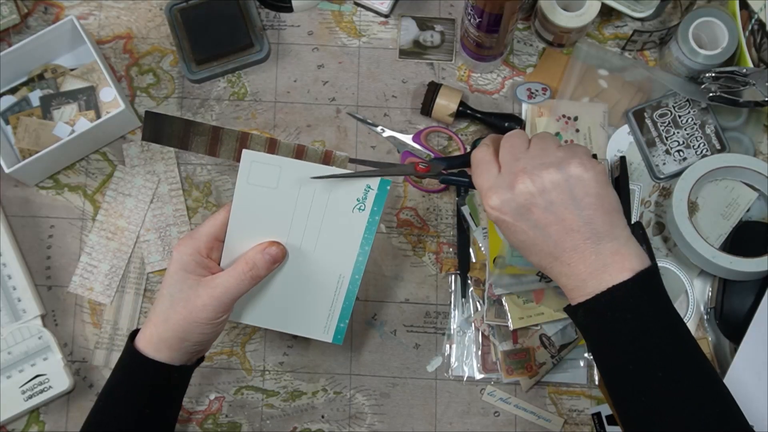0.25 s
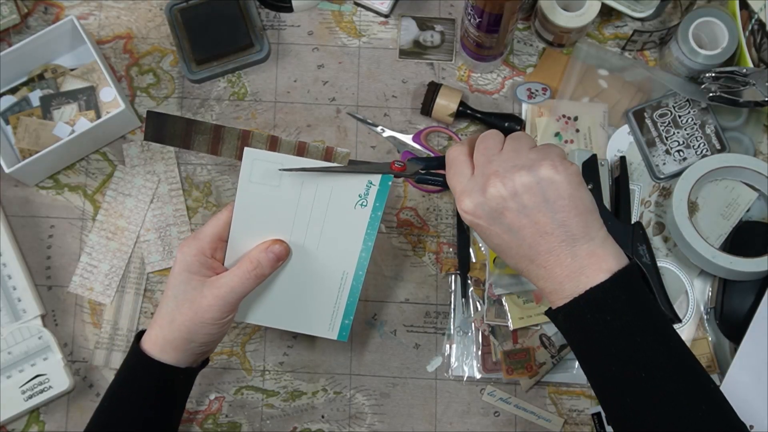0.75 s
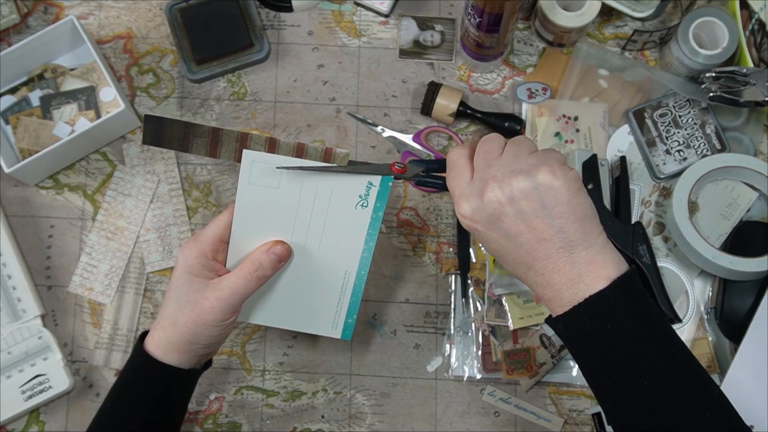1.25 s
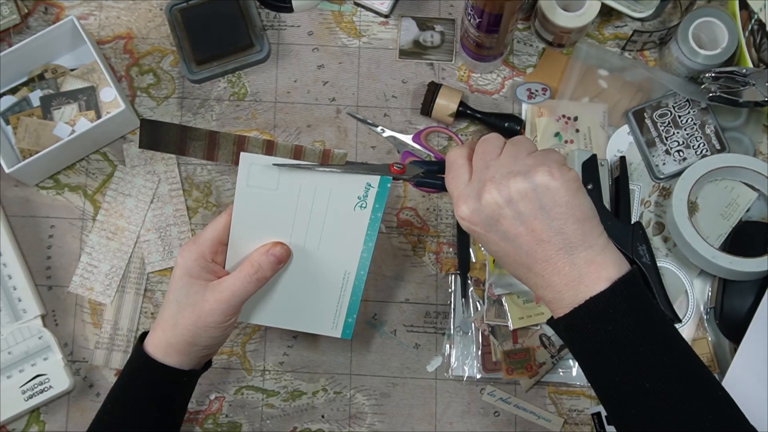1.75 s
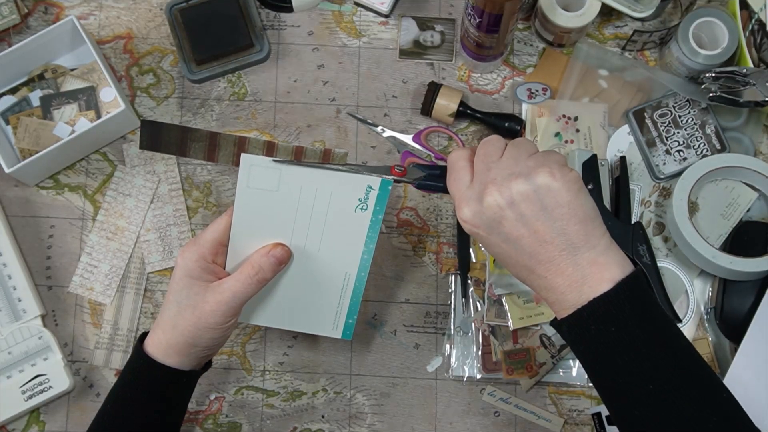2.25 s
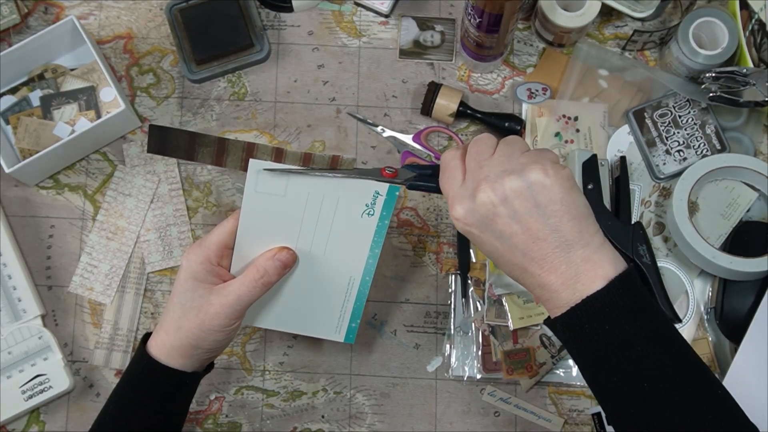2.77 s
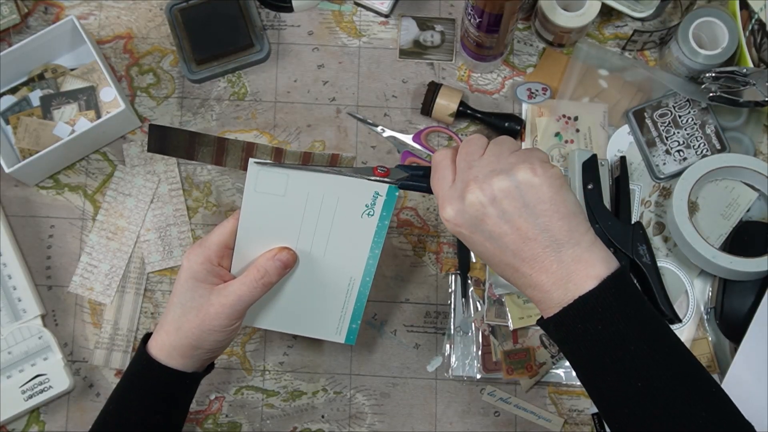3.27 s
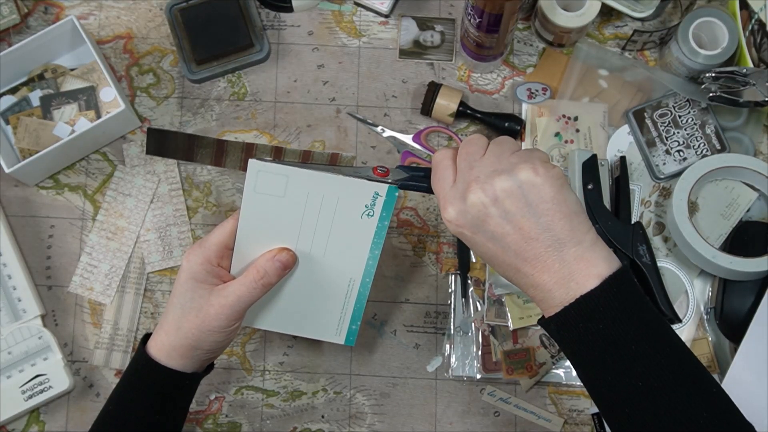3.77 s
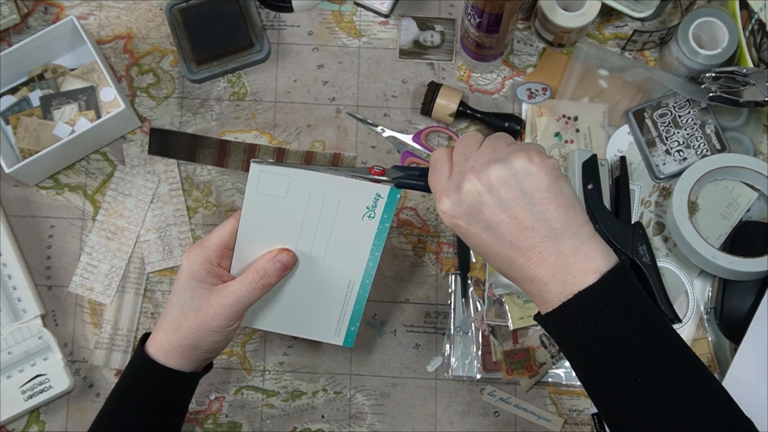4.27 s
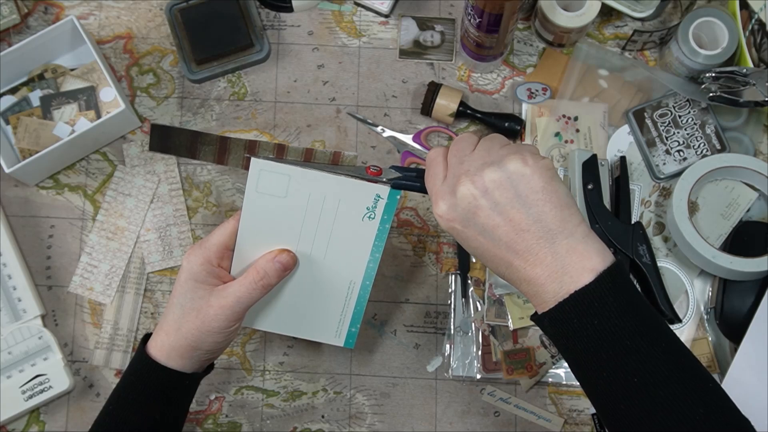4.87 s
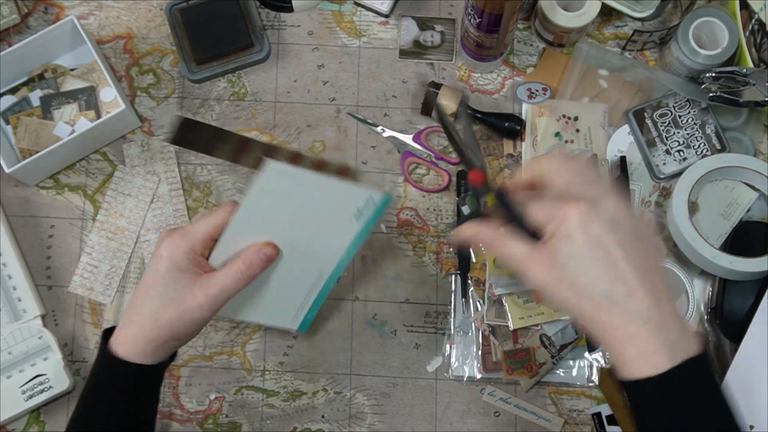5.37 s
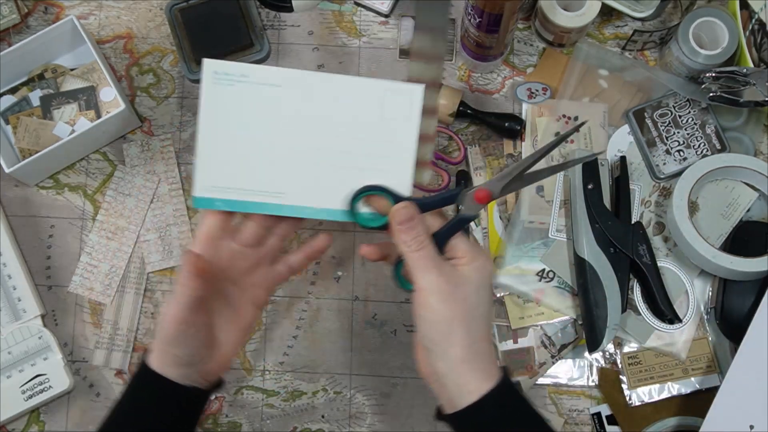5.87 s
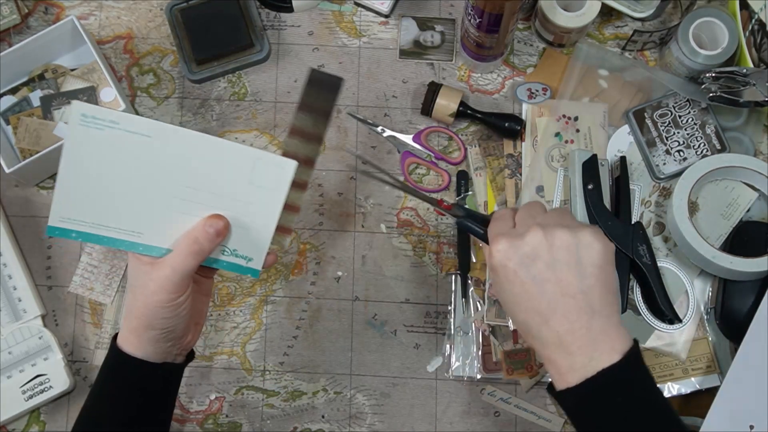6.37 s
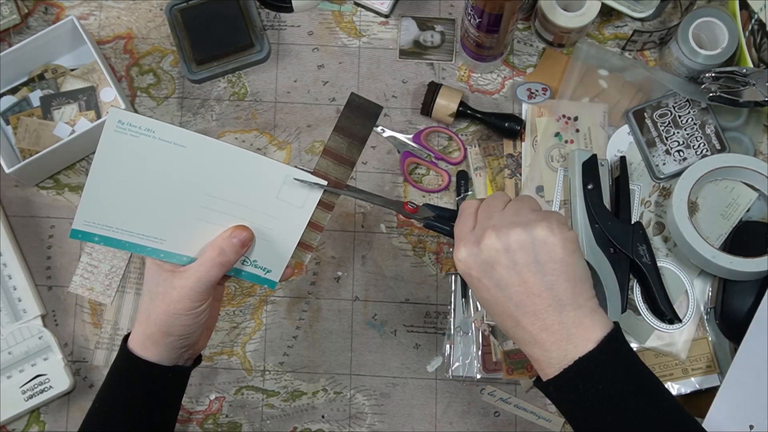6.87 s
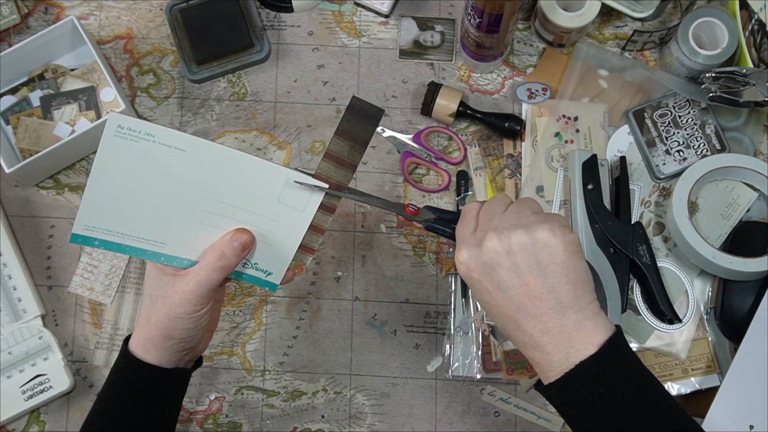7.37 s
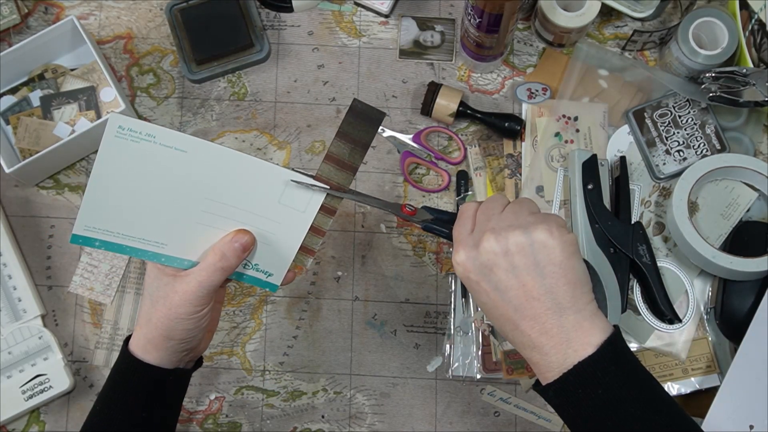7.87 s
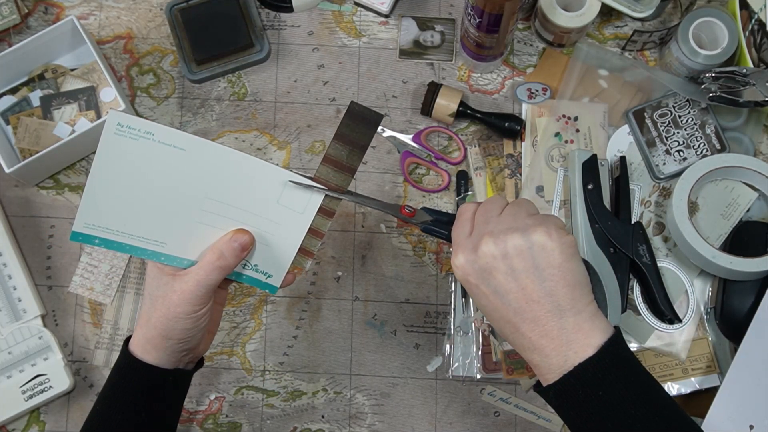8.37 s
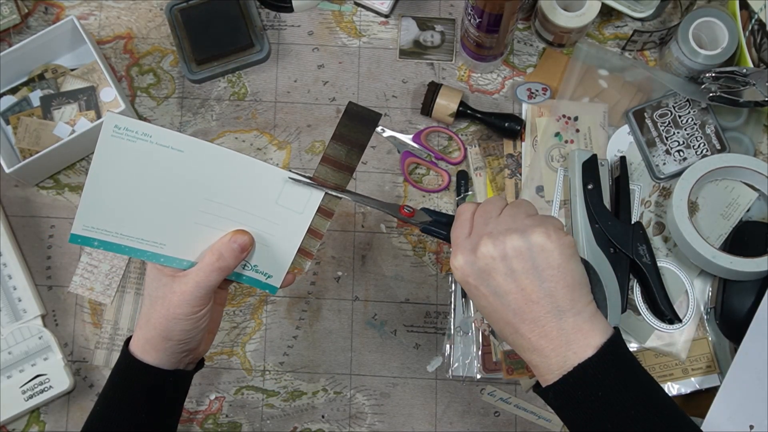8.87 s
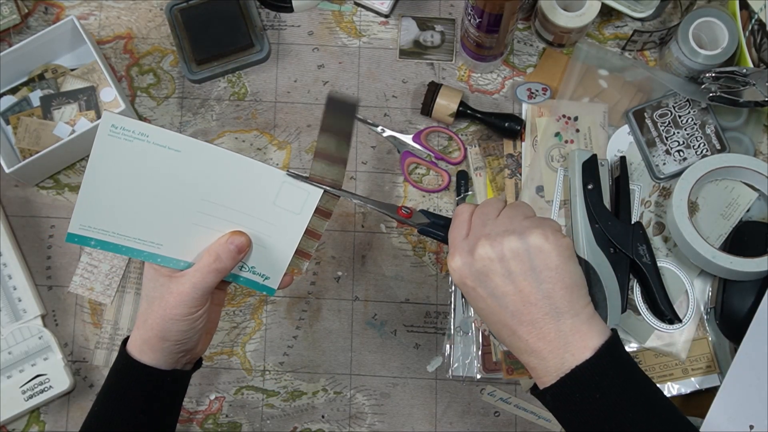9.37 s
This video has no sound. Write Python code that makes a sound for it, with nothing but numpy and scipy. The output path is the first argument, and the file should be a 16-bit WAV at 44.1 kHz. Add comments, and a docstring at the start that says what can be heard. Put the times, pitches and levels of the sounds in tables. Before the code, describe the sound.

Small scissors trim a paper strip along the edge of a card. A few light snips come first, then tighter clusters of sharp, crisp cuts with a slight metallic ring. Paper and card rustle and tick briefly as they are handled. After a pause, several softer snips follow. The sound is dry, picked up by a stereo microphone above a craft table in a small, quiet room with a faint steady hush.

```python
"""Small scissors trim a paper strip off a card above a craft table, under a stereo microphone.
Each snip or tick is an impulsive excitation: a few ms of tearing fibres drive the damped modes of
blades and card. Between snips, blades and fingers rub on the paper, and friction drives the same modes.
A small room adds diffuse reverberation and a steady hush."""
import sys
import numpy as np
from scipy import signal
from scipy.fft import rfft, irfft, next_fast_len
from scipy.io import wavfile
from scipy.ndimage import uniform_filter1d

SR = 44100
rng = np.random.default_rng(int(sys.argv[2]) if len(sys.argv) > 2 else 0)


def transcribe(signal):
    """Save signal, clipped to [-1, 1], as a 16-bit WAV file at the path in sys.argv[1]."""
    frames = np.atleast_2d(signal).T
    limited = np.clip(frames, -1, 1)
    pcm = np.round(limited * 32767).astype(np.int16)
    wavfile.write(sys.argv[1], SR, pcm)


N = 424241


def amplitude(db):
    return 10 ** (np.asarray(db) / 20)


def unit_rms(x):
    return x / np.sqrt(np.mean(x ** 2))


def over_log_hz(hz, table, column=1):
    table = np.array(table)
    return np.interp(np.log(hz + 1e-9), np.log(table[:, 0]), table[:, column])


def mix_in(out, start_s, x):
    i = int(start_s * SR)
    out[:, i:i + x.shape[1]] += x[:, :max(N - i, 0)]


def resonate(x, modes, gain_db=0., order=1):
    """Modal superposition: damped resonances filter x in parallel; a higher order steepens the skirts."""
    size = next_fast_len(len(x))
    f = np.fft.rfftfreq(size, 1 / SR)
    hz, width, db = np.transpose(modes)[:, :, None]
    gain = amplitude(db + np.reshape(gain_db, (-1, 1)))
    response = gain * 1j * f * width / (hz ** 2 - f ** 2 + 1j * f * width)
    return irfft(rfft(x, size) * response.sum(axis=0) ** order, size)[:len(x)]


# left-right coherence of sound from all around: frequency_hz, coherence_ratio
COHERENCE = [(25, .96), (60, 0.98), (130, 0.82), (290, 0.66), (1400, 0.6), (3100, 0.44), (6800, 0.17),
             (15000, 0)]
def diffuse_field(size):
    """Spatial coherence: two noise spectra, alike in the bass and unrelated in the treble."""
    f = np.fft.rfftfreq(size, 1 / SR)
    coherence = np.clip(over_log_hz(f, COHERENCE), 0, 1)
    mid, side = rfft(rng.standard_normal((2, size)))
    mid, side = mid * np.sqrt((1 + coherence) / 2), side * np.sqrt((1 - coherence) / 2)
    return f, np.array([mid + side, mid - side])


# spectrum of the hush: frequency_hz, relative_density_db
HUSH_SPECTRUM = [(20, -25), (177, -3), (340, -6.5), (560, -9.5), (1910, -12.5), (3600, -16), (6180, -21),
                 (16000, -28)]
def hush(level_db=-62):
    """Stationary noise: air and microphone set a steady floor."""
    size = next_fast_len(N)
    f, noise = diffuse_field(size)
    coloured = irfft(noise * amplitude(over_log_hz(f, HUSH_SPECTRUM)), size)[:, :N]
    return unit_rms(coloured) * amplitude(level_db)


LEAD_SAMPLES = 128  # before a tear's onset
def tear(decay_s, size=4096):
    """Fracture: fibres let go in an uneven burst, whitened to a broadband excitation."""
    t = np.maximum(np.arange(size) - LEAD_SAMPLES, 0) / SR
    fibres = rng.standard_normal(size) * amplitude(3.3 * rng.standard_normal(size))
    envelope = (1 - np.exp(-t / 0.00041)) * np.exp(-(t / decay_s) ** 1.44)
    spectrum = rfft(fibres * envelope)
    smoothed_power = uniform_filter1d(np.abs(spectrum) ** 2, size=48)
    return t, irfft(spectrum / np.sqrt(smoothed_power), size)


# blade modes, and the band that radiates well: centre_hz, width_hz, gain_db
BLADE_MODES = [(1460, 370, 6.5), (1715, 73, 11.5), (1830, 160, 2.5), (2110, 290, 10), (2520, 290, 0),
               (2900, 130, 5), (3440, 250, -6), (4000, 42, 7), (4160, 134, -3), (4630, 88, 12.5)]
RADIATION_BAND = [(3074, 5460, -0.5)]
def blades(force, mode_db):
    """Radiation efficiency: modes of alternating sign stand on the band a small object radiates well."""
    mode_db = mode_db + np.zeros(len(BLADE_MODES))
    ringing = sum((-1) ** k * resonate(force, [mode], mode_db[k]) for k, mode in enumerate(BLADE_MODES))
    return resonate(ringing + amplitude(-5.5) * force, RADIATION_BAND, order=4)


# card modes: centre_hz, width_hz, gain_db
CARD_MODES = [(250, 180, 2.8), (493, 205, 1), (870, 460, 0.62)]
def card(force, mode_db=0.):
    """Heavy damping: the card's low, wide modes thump briefly."""
    return resonate(force, CARD_MODES, mode_db, order=2)


# treble bands of the cutting edge: centre_hz, width_hz, gain_db
EDGE_BANDS = [(7320, 3900, 1.5), (11550, 10800, -0.5)]
def edge(force):
    """Broadband response: a burst comes out as a crack, a sustained force as a hiss."""
    return resonate(force, EDGE_BANDS, order=2)


def octaves_from(hz, modes):
    return np.abs(np.log2(np.array(modes)[:, 0] / hz))


# snips and ticks, crack and thump relative to the ring:
# start_s, nominal_peak_db, ring_hz, crack_db, thump_hz, thump_db
SNIP_EVENTS = [(0.671, -37.5, 2620, -5.5, 810, -7.5), (0.7461, -31.5, 2950, -4.5, 880, -11),
               (0.818, -29.5, 3160, -5, 848, -13), (2.153, -33.5, 3660, -3, 520, -4),
               (2.218, -43.5, 2570, -4, 441, -5), (2.4249, -48, 1340, -5, 503, -3),
               (2.4666, -48.5, 4290, -1.5, 202, -11), (2.6564, -29.5, 3400, -4, 202, -19),
               (2.6908, -39, 1600, -10, 501, -9.5), (2.7782, -43, 2540, -3, 894, -4),
               (3.408, -48.5, 2820, -6, 676, -17), (3.4245, -42.5, 3150, -5.5, 202, -13),
               (3.467, -45.5, 3300, -7, 237, -25), (3.552, -46.5, 3670, -7, 773, -22),
               (3.5823, -42, 1570, -9, 840, -5.5), (3.6443, -45, 3320, -9, 762, -10),
               (3.6822, -31, 2860, -8, 904, -25), (3.6898, -25, 3730, -4, 1100, -18),
               (3.7002, -17, 4150, -5, 487, -17), (3.8424, -27.5, 3450, -7, 498, -21.5),
               (3.9161, -29, 2900, -10.5, 514, -16), (3.9239, -28.5, 3630, -7, 513, -11.5),
               (4.2, -50.5, 1710, -8, 600, -1), (4.4641, -42.5, 3190, -8, 1070, -20),
               (4.4852, -44, 2510, -18, 937, -15), (4.494, -38.5, 2200, -13, 1010, -15),
               (4.5247, -26.5, 3350, -10, 860, -19.5), (4.5555, -23, 3380, -9, 890, -21.5),
               (4.5695, -27, 2250, -28, 1010, -17), (4.6112, -28, 3650, -5.5, 1000, -18.5),
               (4.6832, -41.5, 3700, -30, 1050, -11.5), (4.8522, -16, 4150, -3.5, 820, -18.5),
               (5.0374, -47, 2630, -5, 546, -7), (5.0586, -33, 2760, -14, 606, -7.5),
               (5.064, -28, 3250, -6.5, 490, -9), (5.0758, -24, 3460, -5.5, 490, -12.5),
               (5.2338, -36.5, 3580, 1, 969, -29), (5.2509, -36.5, 4330, 0.5, 277, -25),
               (5.6361, -31, 2270, -8, 272, -12.5), (5.681, -33, 2500, -13, 972, -21),
               (5.6918, -34, 3030, -13, 904, -28), (5.8339, -47, 3340, -26, 331, -7),
               (5.9264, -49, 1570, -11, 245, -11), (6.074, -35, 2750, -14, 764, -20),
               (6.1389, -30, 3450, -8, 1090, -12), (6.1595, -30, 3280, -5, 1100, -15),
               (6.1701, -36, 3340, 0.5, 1100, -14), (8.9478, -42, 2490, 1, 237, -4.5),
               (9.0585, -55.5, 2360, 4, 404, -2), (9.2657, -49, 4660, 0, 213, -2),
               (9.3004, -44, 2530, -4, 870, -1.5), (9.3336, -47, 2550, -9, 266, -4),
               (9.371, -33.5, 2140, -10, 1020, -8), (9.3782, -34, 4130, -31, 1060, -5),
               (9.4473, -40.5, 2220, -18, 554, -7.5), (9.524, -33.5, 3880, -2, 580, -5.5),
               (9.6144, -43.5, 5400, -37, 202, -12)]
def snips(crest_db=9.5, ring_db_per_octave=-32.5, ring_floor_db=-18.5, thump_db_per_octave=-6):
    """Impulsive excitation: each tear favours the blade and card modes near its pitches, and cracks."""
    out = np.zeros((2, N))
    onset = slice(LEAD_SAMPLES, 3 * LEAD_SAMPLES)  # the first 6 ms set each part's level
    for start_s, peak_db, ring_hz, crack_db, thump_hz, thump_db in SNIP_EVENTS:
        # lower thumps and louder snips come from longer tears
        decay_ms = 3.2 - 0.78 * np.log2(thump_hz / 600) + 0.05 * (peak_db + 35)
        decay_s = max(decay_ms, .5) / 1000
        t, burst = tear(decay_s)
        mode_db = np.maximum(ring_db_per_octave * octaves_from(ring_hz, BLADE_MODES), ring_floor_db)
        ring = blades(burst, mode_db)
        thump = card(burst, thump_db_per_octave * octaves_from(thump_hz, CARD_MODES))
        crack = edge(burst * np.exp(-t / (2 * decay_s)))
        parts = (ring, 0.), (thump, thump_db), (crack, crack_db)
        snip = sum(amplitude(db) * x / np.sqrt(np.mean(x[onset] ** 2)) for x, db in parts)
        mix_in(out, start_s - LEAD_SAMPLES / SR, room(amplitude(peak_db - crest_db) * snip))
    return out


# reverberant tail: frequency_hz, t60_s, energy_re_direct_db
ROOM_DECAY = [(250, 0.3, -3.5), (700, 0.4, -8), (2000, 0.17, -3), (4000, 0.4, -10.5), (8000, 0.19, 0.5),
              (14000, 0.26, -8)]
def room(x, size=12288):
    """Reverberation: each octave decays exponentially; the hands move, so each sound finds new echoes."""
    f, noise = diffuse_field(size)
    t, response = np.arange(size) / SR, 0
    for hz in 125 * 2. ** np.arange(8):
        band = irfft(noise * np.clip(1 - np.abs(np.log2((f + 1) / hz)), 0, 1) ** .5, size)
        t60_s = over_log_hz(hz, ROOM_DECAY)
        decay = amplitude(over_log_hz(hz, ROOM_DECAY, column=2) - 60 * t / t60_s)
        energy_norm = np.sqrt(2 * np.log(1000) / (t60_s * SR))
        response = response + band * decay * energy_norm
    response *= np.clip((t - .0015) / 0.0013, 0, 1)  # echoes begin after 1.5 ms
    response[:, 0] = 1  # direct sound
    return signal.fftconvolve(x[None], response, axes=1)


def paper_grain(rate_hz=150):
    """Amplitude modulation: dense small slips swell and sink at random with the paper's grain."""
    hold = int(SR / rate_hz)
    slips = rng.standard_normal(N)
    slip_db = 0.9 * rng.exponential(size=N)
    swell_db = 3 * uniform_filter1d(np.repeat(rng.standard_normal(N // hold + 1), hold), hold)[:N]
    return slips * amplitude(slip_db + swell_db)


def fibre_catches(rate_per_s=41, spread_db=4, decay_ms=2.5):
    """Poisson process: the gain of the hiss jumps briefly each time the edge catches on fibres."""
    hits = (rng.random(N) < rate_per_s / SR) * amplitude(spread_db * rng.exponential(size=N))
    return 1 + signal.lfilter([1], [1, -np.exp(-1000 / (decay_ms * SR))], hits)


# strokes on paper, squeal and hiss relative to the ring:
# start_s, end_s, start_db, end_db, squeal_hz, squeal_db, hiss_db
RUB_STROKES = [(1.691, 2.024, -75, -75.5, 3340, -11, -0.5), (2.167, 2.538, -66.5, -69, 2600, -10, -4),
               (2.65, 2.95, -57.5, -66.5, 4500, -22, -8), (2.744, 2.928, -77.5, -86, 11900, 14.5, -8),
               (3.404, 3.473, -75, -66, 3300, -1, -15), (3.544, 3.7, -80, -55.5, 3540, -13, -5.5),
               (4.45, 4.522, -69, -64, 2410, -14, -21), (5.067, 5.209, -57.5, -52.5, 4210, 0, -3.5),
               (5.222, 5.271, -52, -59.5, 4330, 6, -8), (5.267, 5.424, -63.5, -68.5, 3350, -25, -4),
               (5.608, 5.632, -59, -61, 2290, 3.5, -7), (5.657, 5.752, -49, -59.5, 3180, -7, -1),
               (5.741, 5.953, -63, -67.5, 3200, -21, -8), (5.95, 6.017, -62.5, -52, 3200, -12, -0.5),
               (6.01, 6.104, -52.5, -61, 3120, -4, 0), (6.17, 6.653, -57, -76, 3070, -16, -11.5),
               (8.406, 8.705, -80, -87, 5400, 0, 6.5), (8.846, 8.88, -70, -78, 5600, 0, 4),
               (9.155, 9.374, -70, -78, 4760, -12, 1), (9.377, 9.514, -56, -77, 2170, -4, -20),
               (9.52, 9.634, -57.5, -76, 3740, -9, -26)]
def rubs(fade_s=0.0041):
    """Sliding friction: small slips on the paper ring blades and card, squeal thinly and hiss."""
    out = np.zeros((2, N))
    grain, catch_gain = paper_grain(), fibre_catches()
    for start_s, end_s, start_db, end_db, squeal_hz, squeal_db, hiss_db in RUB_STROKES:
        stroke = slice(int(start_s * SR), min(int(end_s * SR), N))
        t, slips = np.arange(N)[stroke] / SR, grain[stroke]
        ring = blades(slips, mode_db=-6.5)  # paper pressed on the blades weakens their modes
        signs = np.sign(rng.standard_normal(len(t)))  # the hiss shares the slips' grain, not their phase
        hiss = edge(slips * catch_gain[stroke] * signs)
        squeal = resonate(slips, [(squeal_hz, squeal_hz * 0.065, 0)], order=2)
        parts = (ring, 0.), (card(slips), -7.), (hiss, hiss_db), (squeal, squeal_db)
        rub = sum(amplitude(db) * unit_rms(x) for x, db in parts)
        fade = np.clip(np.minimum(t - start_s, end_s - t) / fade_s, 0, 1)
        level = amplitude(np.interp(t, (start_s, end_s), (start_db, end_db)))
        mix_in(out, start_s, room(fade * level * rub))
    return out


def scene():
    """Superposition: the pressures of the sources add."""
    return hush() + snips() + rubs()


def record(dry):
    """Band limiting: a steep elliptic low-pass cuts the top of the treble."""
    cutoff_hz = 15750
    return signal.sosfilt(signal.ellip(10, .2, 60, cutoff_hz, fs=SR, output="sos"), dry)


dry = scene()
out = record(dry)
transcribe(out)
```